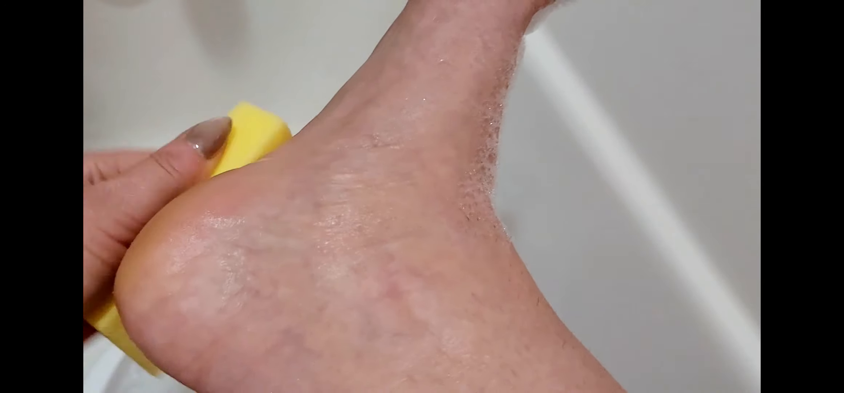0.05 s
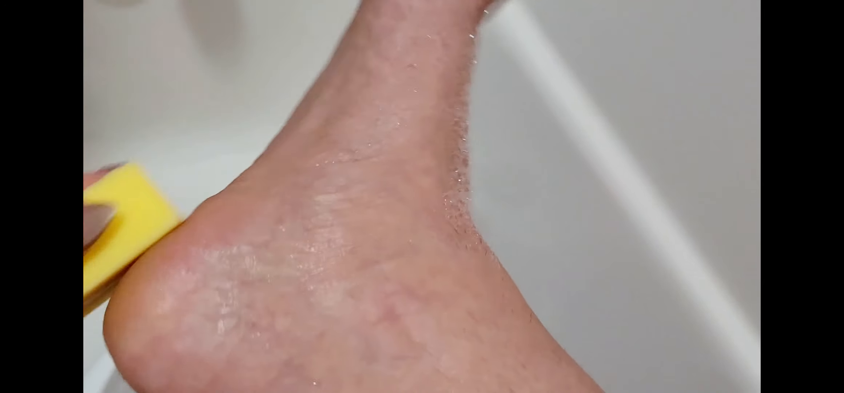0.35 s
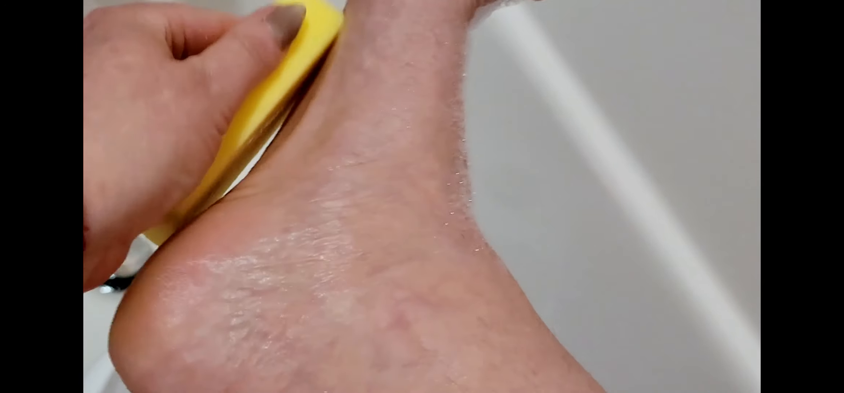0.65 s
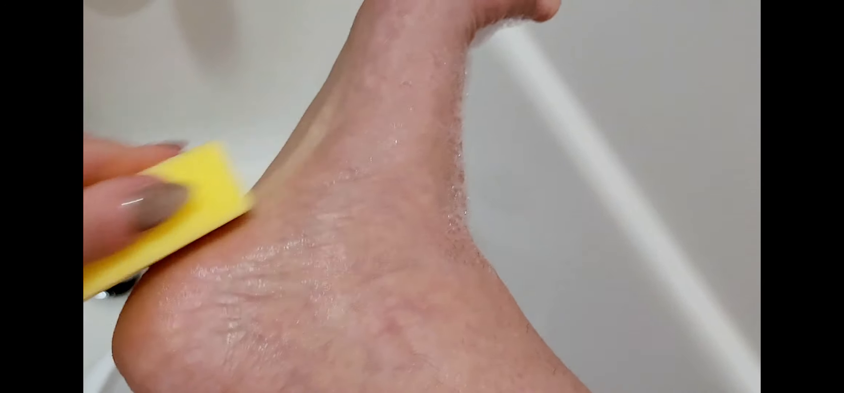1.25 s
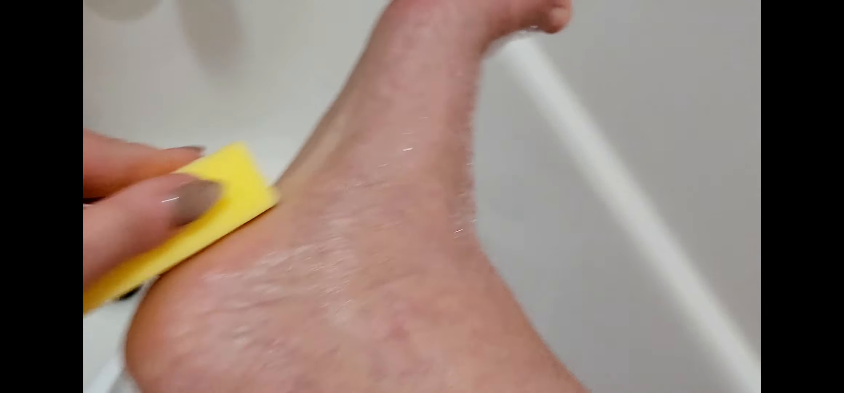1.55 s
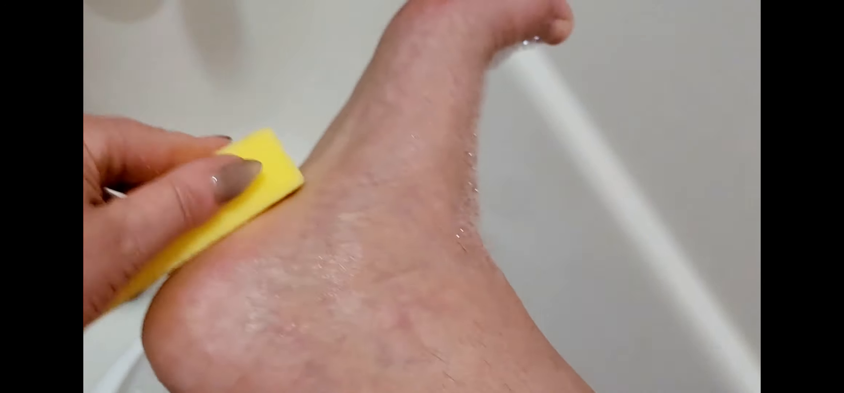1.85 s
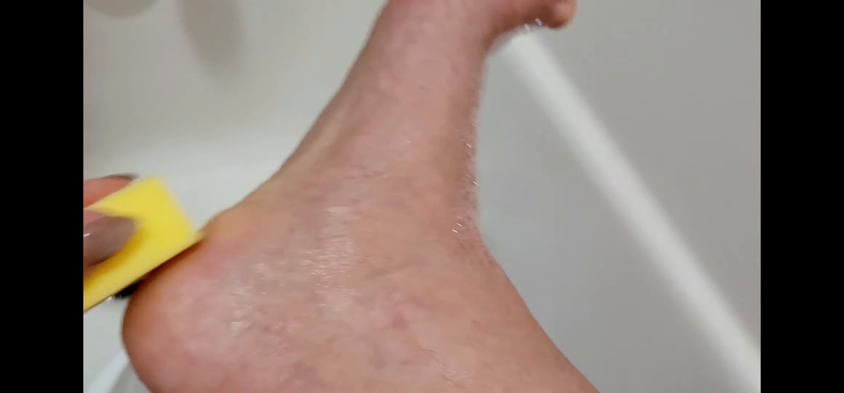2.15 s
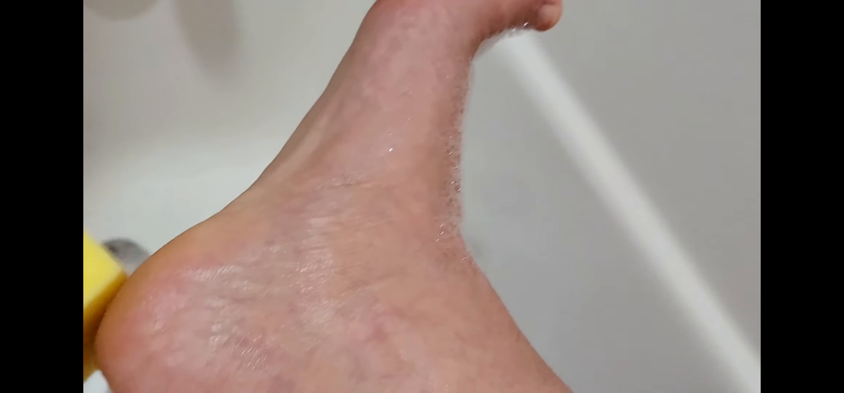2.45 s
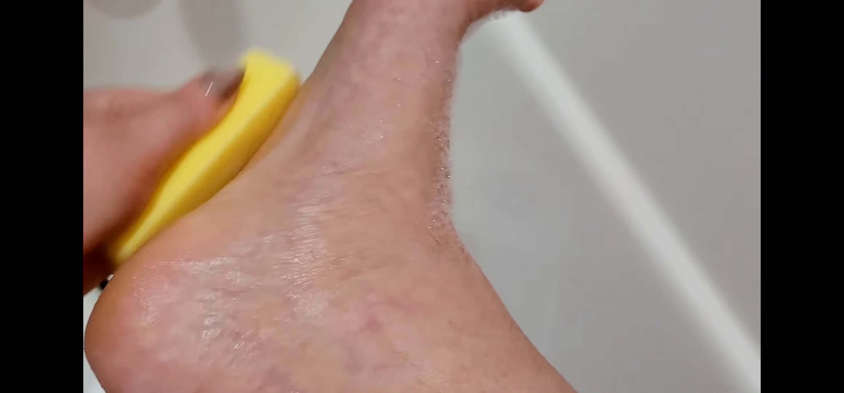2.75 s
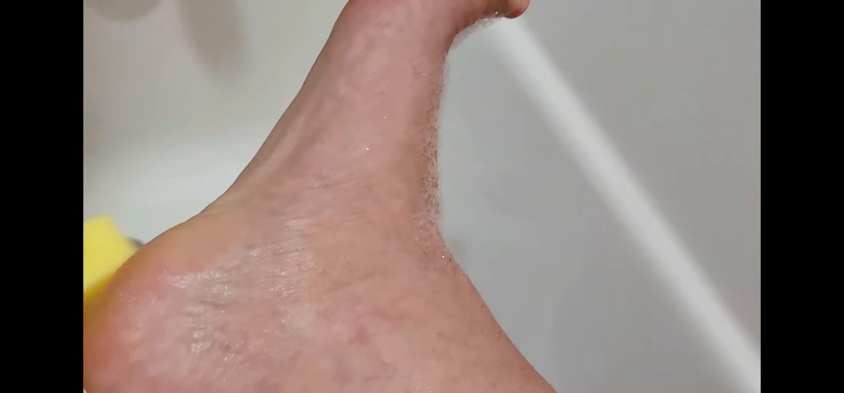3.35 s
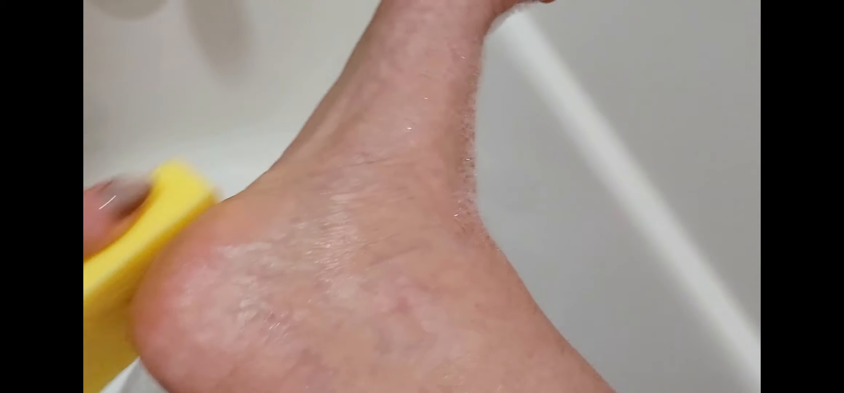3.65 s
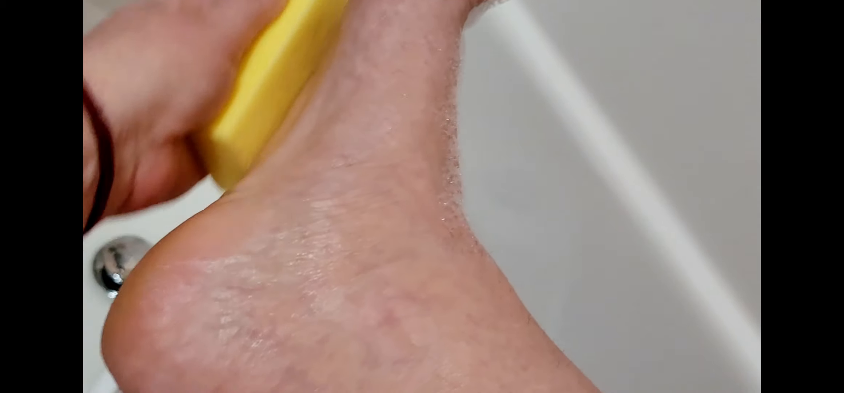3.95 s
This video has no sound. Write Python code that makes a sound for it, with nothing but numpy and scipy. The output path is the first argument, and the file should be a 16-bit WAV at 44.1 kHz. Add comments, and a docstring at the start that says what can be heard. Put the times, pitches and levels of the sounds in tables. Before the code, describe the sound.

A pumice block rasps on a heel, close by. About thirteen short, gritty strokes go back and forth, roughly five a second, until 2.5 seconds. Three longer sweeps follow at about 2.6, 3.0 and 3.6 seconds, the last one strongest. Brief skin squeaks and hollow palm tones dot the scraping. The bathtub hums faintly with some pushes, and the tiled room adds a short echo over a quiet low drone.

```python
"""A dense, gritty rasp goes back and forth: thirteen short strokes, then three long sweeps.
It is a pumice block rubbed on a heel over a bathtub. Its pores catch the skin in a rasp that follows
the speed of the hand and rings the block and the hollow of the palm. High skin squeaks and low palm
tones ring briefly, and pushes make the tub hum. The tiled room gives a short tail over a low drone."""
import sys
import numpy as np
from scipy import signal
from scipy.fft import rfft, irfft
from scipy.io import wavfile

SR = 44100
rng = np.random.default_rng(int(sys.argv[2]) if len(sys.argv) > 2 else 0)


def transcribe(u):
    """Save the signal u as a 16-bit wav file named by the first command-line argument.

    u: samples, shape (n,) or (channels, n), limited to [-1, 1]; the rate is SR.
    q: integer samples, one column per channel.
    """
    v = np.clip(np.atleast_2d(u).T, -1, 1)
    q = np.round(v * 32767).astype(np.int16)
    wavfile.write(sys.argv[1], SR, q)


N = 176400
TIME_S, BINS_HZ = np.arange(N) / SR, np.fft.rfftfreq(N, 1 / SR)


def amp(db):
    """Decibels to gain."""
    return 10 ** (np.asarray(db) / 20)


def unit(x):
    """Scales to an rms of one."""
    return x / np.sqrt(np.mean(x ** 2) + 1e-20)


def lookup(points, hz):
    """Interpolates rows of (Hz, value) on a log-frequency axis."""
    f, value = np.transpose(points)
    return np.interp(np.log(hz + 1), np.log(f + 1), value)


def colour(x, points):
    """Filters by rows of (Hz, dB)."""
    return irfft(rfft(x) * amp(lookup(points, BINS_HZ)), N)


def resonate(x, hz, width_hz):
    """Steep resonance at hz, a number or a curve."""
    turn = np.exp(2j * np.pi * np.cumsum(hz * np.ones(N)) / SR)
    r = np.exp(-np.pi * width_hz / SR)
    return (turn * signal.lfilter([(1 - r) ** 2], [1, -2 * r, r * r], x * turn.conj())).real


def wander(hz):
    """Smooth random curve of unit rms, rolling off above hz."""
    return unit(irfft(rfft(rng.standard_normal(N)) / np.hypot(1, BINS_HZ / hz) ** 2, N))


def swell(start_s, length_s):
    """One arch of a sine."""
    return np.sin(np.pi * np.clip((TIME_S - start_s) / length_s, 0, 1))


# Each row: frequency in Hz, relative noise density in dB.
AIR_SPECTRUM = [(20, -11), (35, -11), (60, 1.5), (90, -1), (125, -10), (190, -18), (260, -10), (350, -12),
                (520, -16), (1450, -36), (1850, -9), (2250, -19.5), (5000, -16), (15000, -30)]
# Each row: frequency in Hz, left-right coherence from 0 to 1.
AIR_COHERENCE = [(30, 0.65), (100, .85), (170, 0.81), (280, 0), (700, 1), (1500, 0.71)]


def room_air(level_db=-50.5):
    """Low rumble and faint hiss of the room."""
    left, other = rfft(rng.standard_normal((2, N)))
    coherence = lookup(AIR_COHERENCE, BINS_HZ)
    right = coherence * left + np.sqrt(1 - coherence ** 2) * other
    return amp(level_db) * unit(colour(irfft(np.array([left, right]), N), AIR_SPECTRUM))


# Each row: centre in Hz, width in Hz, level in dB.
DRONE_TONES = [(49.8, 8.6, -52.5), (253.7, 8.5, -70.5), (297.8, 14, -64.5), (342, 18, -66.5)]


def drone():
    """Narrow bands of noise, heard as low wavering tones."""
    noise = rfft(rng.standard_normal(N))
    return sum(amp(db) * unit(irfft(noise / (1 + ((BINS_HZ - hz) / width_hz * 2) ** 2), N))
               for hz, width_hz, db in DRONE_TONES)


# Each row: frequency in Hz, width in Hz, relative level in dB.
TUB_MODES = [(251, 17, -1.5), (293.5, 6.4, 2.5), (337, 33, -4.5)]
# Each row: start in seconds, length in seconds, peak level in dB.
HAND_PUSHES = [(0.161, 0.092, -46), (0.497, 0.15, -52), (0.744, 0.32, -51.5), (1.044, 0.167, -49),
               (2.202, 0.23, -56), (2.988, 0.15, -51), (3.157, 0.16, -52), (3.626, 0.12, -49.5)]


def tub_hum():
    """Low modes of the tub, stirred when the hand pushes on the foot."""
    rub = rng.standard_normal(N)
    ring = unit(sum(amp(db) * unit(resonate(rub, hz, width_hz)) for hz, width_hz, db in TUB_MODES))
    return ring * sum(amp(db) * swell(start_s, length_s) for start_s, length_s, db in HAND_PUSHES)


# Each row: frequency in Hz, time to decay by 60 dB in seconds.
TAIL_T60 = [(150, 0.76), (300, 1), (800, 0.32), (2000, 0.45), (5000, 0.37), (9000, 0.33), (15000, 0.25)]
EARLY_DB, TAIL_DB = 4.5, -4.5  # relative to the direct sound


def reflections(early_decay_s=0.0078, tail_rise_s=0.027):
    """Stereo echoes: a quick cluster from tub and leg, then the tail of the tiled room."""
    t = np.arange(SR // 2) / SR
    shape = (2, len(t))
    taps = rng.standard_normal(shape) * (rng.random(shape) < .3)
    early = taps * np.exp(-t / early_decay_s)
    diffuse = rng.standard_normal(shape) * np.minimum(t / tail_rise_s, 1)
    hz, frame_s, frames = signal.stft(diffuse, SR, nperseg=256)
    decay = amp(-60 * frame_s / lookup(TAIL_T60, hz)[:, None])
    tail = signal.istft(frames * decay, SR, nperseg=256)[1][:, :len(t)]
    return sum(amp(db) * part / np.linalg.norm(part, axis=1, keepdims=True)
               for part, db in [(early, EARLY_DB), (tail, TAIL_DB)])


def bathroom(sources, left_lag_s=0.00024):
    """Each place of contact is heard directly and through its own pattern of echoes."""
    total = sources.sum(0)
    direct = np.array([np.roll(total, round(left_lag_s * SR)), total])
    echoes = sum(signal.oaconvolve(x[None], reflections(), axes=1)[:, :N] for x in sources)
    return (direct + echoes) / np.sqrt(1 + amp(EARLY_DB) ** 2 + amp(TAIL_DB) ** 2)


def colour_drift(x, bands=9, low_hz=600, high_hz=16000, rate_hz=12, depth_db=1.0):
    """Overlapping bands of the rasp swell and fade independently."""
    position = np.clip(np.log((BINS_HZ + 1) / low_hz) / np.log(high_hz / low_hz), 0, 1) * (bands - 1)
    spectrum = rfft(x)
    split = (irfft(spectrum * np.maximum(1 - np.abs(position - k), 0), N) for k in range(bands))
    return sum(band * amp(depth_db * wander(rate_hz)) for band in split)


def grit(grains_per_s=14000, spread_db=3.0):
    """Tiny snaps of uneven size as the pores catch and release the skin."""
    size = amp(spread_db * np.minimum(rng.exponential(1, N), 5))
    return size * rng.choice([-1., 1.], N) * (rng.random(N) < grains_per_s / SR)


# Each row: start in seconds, length in seconds, pitch in Hz, peak level in dB.
BRIEF_RESONANCES = [(-.01, 0.055, 2200, -36), (0.042, .1, 1900, -47), (.205, .05, 740, -43),
                    (0.285, 0.072, 2330, -36), (0.422, 0.052, 855, -38), (.63, .05, 780, -43),
                    (2.24, .07, 2350, -46), (2.59, .07, 2210, -37), (2.845, 0.057, 723, -39),
                    (3.098, 0.096, 690, -39), (3.476, 0.05, 2780, -36), (3.69, 0.054, 2400, -33),
                    (3.832, .09, 730, -34), (3.9, 0.077, 680, -31.5)]


def brief_resonances(width_ratio=.18):
    """Short narrow rings: high skin squeaks (1.9-2.8 kHz), low tones of the cupped palm (680-855 Hz)."""
    snaps = grit()
    return sum(amp(db) * swell(start_s, length_s) * unit(resonate(snaps, hz, width_ratio * hz))
               for start_s, length_s, hz, db in BRIEF_RESONANCES)


# Each row: time in seconds, pitch of the hollow in Hz.
PALM_PITCH = [(0, 700), (.27, 834), (.45, 850), (.66, 750), (.88, 960), (1.08, 700), (1.269, 905),
              (1.85, 760), (2.27, 830), (2.48, 750), (2.66, 1030), (2.87, 710), (3.1, 785), (3.17, 675),
              (3.5, 670), (3.73, 1070), (3.85, 730), (3.95, 660)]
# Path out of the hand. Each row: frequency in Hz, gain in dB.
PALM_SPECTRUM = [(300, -28), (530, -10.5), (620, -2), (690, 1.5), (770, 0.5), (900, -0.5), (1150, 1.5)]


def palm_hollow(snaps, width_hz=450):
    """The hollow of the palm rings, sinking in pitch as the hand closes over the heel."""
    pitch_hz = np.interp(TIME_S, *np.transpose(PALM_PITCH))
    return colour(resonate(snaps, pitch_hz, width_hz), PALM_SPECTRUM)


# Each row: start, speed-up and slow-down in seconds, share of the speed-up done at first contact,
# drive level in dB, then fizz, block and palm offsets in dB.
SHORT_STROKES = [(-0.127, 0.072, 0.17, 0.0, -25, -6.5, -24, -24.5),
                 (0.096, 0.18, 0.097, 0.18, -29, -5.1, -10.5, -15),
                 (0.382, 0.062, 0.17, 0.57, -27, -4.5, -11.5, -19.5),
                 (0.54, 0.1, 0.11, 0.2, -27, -5, -9.5, -23.5),
                 (0.752, 0.12, 0.118, 0.3, -22.5, -5.5, -15, -22.5),
                 (1.006, 0.082, 0.098, 0.49, -28.5, -3.5, -11.5, -45),
                 (1.158, 0.109, 0.13, 0.21, -26, -4.5, -12, -17.5),
                 (1.405, 0.062, 0.085, 0.63, -34, -3, -11.5, -24),
                 (1.589, 0.084, 0.096, 0.21, -35.5, -5.5, -10, -32),
                 (1.799, 0.051, 0.11, 0.5, -31, -3.5, -9, -19),
                 (1.962, 0.12, 0.085, 0.29, -29, -5.5, -7.5, -20.5),
                 (2.184, 0.077, 0.13, 0.46, -27.5, -4, -12, -20.5),
                 (2.372, 0.089, 0.12, 0.4, -30.6, -3.5, -7, -15)]
# One curve per sweep. Each row: time in seconds, drive level in dB, fizz, block and palm offsets in dB.
LONG_SWEEPS = [
    [(2.56, -56, 3, -13, -5), (2.574, -39.5, -3, -3, -25), (2.628, -26.5, -2, -10, -20.5),
     (2.724, -24.5, -4, -10, -20.5), (2.776, -30.5, -2, -7, -12.5), (2.838, -28, -3, -10, -17),
     (2.872, -30.5, -2.5, -11.5, -7), (2.906, -32.5, -4, -11, -27), (2.98, -69, -9, -6, -26)],
    [(2.98, -51.5, -4, -18, -7), (3.024, -41.5, -3, -3.5, -13), (3.104, -28.5, -5.5, -9.5, -13),
     (3.162, -26, -7, -8.5, -11.5), (3.258, -34, -6.5, -15.5, -22), (3.358, -29, -6, -7.5, -17),
     (3.542, -40, -4.5, -8.5, -14), (3.584, -55, -11, -16, -21), (3.61, -61, -5, -1, -18)],
    [(3.61, -64, -4, -8, -20), (3.638, -51.5, 0, -1, -13), (3.672, -32.5, -4, -4.5, -21),
     (3.718, -23.5, -4.5, -17.5, -20), (3.77, -22, -1, -8, -30), (3.854, -24, -5.5, -10.5, -16),
     (3.93, -27, -4, -8.5, -13.5), (4.0, -26.5, -4.5, -12, -22)],
]
# Power of the stroke speed followed by rasp, fizz, block and palm.
SPEED_EXPONENTS = [3, 3.15, 2.8, 2.8]


def hand_drive(contact_s=0.0047):
    """Envelopes of rasp, fizz, block and palm: strokes speed up and stop, sweeps follow level curves."""
    drives = np.zeros((4, N))
    for start_s, rise_s, fall_s, entry, db, *offsets_db in SHORT_STROKES:
        peak_s = start_s + rise_s
        end_s = peak_s + fall_s
        on = (TIME_S > start_s) & (TIME_S < end_s)
        speed = np.sin(np.pi / 2 * np.interp(TIME_S[on], [start_s, peak_s, end_s], [entry, 1, 0]))
        contact = np.minimum((TIME_S[on] - start_s) / contact_s, 1)
        for drive, offset_db, exponent in zip(drives, [0, *offsets_db], SPEED_EXPONENTS):
            drive[on] = np.hypot(drive[on], amp(db + offset_db) * contact * speed ** exponent)
    for sweep in LONG_SWEEPS:
        times_s, db, *offsets_db = np.transpose(sweep)
        on = (TIME_S >= times_s[0]) & (TIME_S < times_s[-1])
        for drive, offset_db in zip(drives, [0, *offsets_db]):
            drive[on] = np.hypot(drive[on], amp(np.interp(TIME_S[on], times_s, db + offset_db)))
    return drives


# Broad rasp, high fizz and ring of the block. Each row: frequency in Hz, relative level in dB.
RASP_SPECTRUM = [(100, -45), (200, -23), (293, -17.5), (400, -16), (540, -19), (630, -7.5), (850, -10),
                 (1100, -8.5), (1400, -2), (1700, -8), (2050, -4.5), (3000, -1.5), (3700, -0.5),
                 (4400, 0.5), (5500, 1.5), (7500, -4), (10000, -18.5), (16000, -12)]
FIZZ_SPECTRUM = [(2000, -52), (5500, -5), (8000, -1.5), (10500, -1), (12500, -3), (15500, -4)]
BLOCK_SPECTRUM = [(900, -46), (1500, -12), (1850, -1.5), (2100, -1.5), (2340, -1), (2750, -2),
                  (3300, -11.5), (6000, -43)]
RASP_DB, FIZZ_DB, BLOCK_DB, PALM_DB = 1.5, 5, 5.5, 4.5


def pumice_scrape(patches=5, chatter_hz=162, chatter_db=0.87):
    """One signal per patch of the block's face: grit heard directly and through block and palm."""
    on_patch = rng.integers(0, patches, N) == np.arange(patches)[:, None]
    palm = amp(PALM_DB) * unit(palm_hollow(grit() * on_patch))
    rasp = amp(RASP_DB) * unit(colour(grit() * on_patch, RASP_SPECTRUM))
    fizz = amp(FIZZ_DB) * unit(colour(grit() * on_patch, FIZZ_SPECTRUM))
    block = amp(BLOCK_DB) * unit(colour(grit() * on_patch, BLOCK_SPECTRUM))
    scrape = sum(drive * part for drive, part in zip(hand_drive(), [rasp, fizz, block, palm]))
    chatter = amp(-chatter_db * wander(chatter_hz))  # skin sticks and slips under the whole block
    return scrape * chatter / np.sqrt(patches)


# Each row: frequency in Hz, left minus right level in dB.
STEREO_BALANCE = [(50, 1), (100, 1.5), (270, 4), (450, 4.5), (740, -.5), (1100, .5), (2000, 0), (3300, -1),
                  (4800, -3), (5600, -2.5), (7300, 1.5), (9000, 0), (15000, .5)]


def scene():
    """Scrape and brief resonances in the bathroom, over tub hum, room air and drone."""
    contacts = np.vstack([pumice_scrape(), brief_resonances()])
    mix = colour_drift(bathroom(contacts)) + tub_hum() + room_air() + drone()
    balance_db = lookup(STEREO_BALANCE, BINS_HZ) * np.array([[.5], [-.5]])
    return irfft(rfft(mix) * amp(balance_db), N)


def record(dry):
    """Steep low-pass on the top treble."""
    cutoff_hz = 15750
    lowpass = signal.firwin(511, cutoff_hz, window=("kaiser", 9), fs=SR)
    return signal.oaconvolve(dry, lowpass[None], "same")


dry = scene()
out = record(dry)
transcribe(out)
```